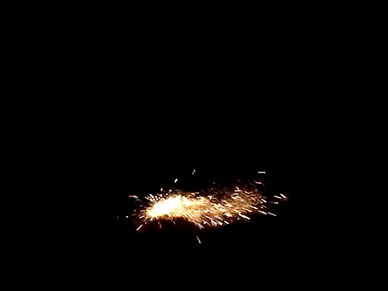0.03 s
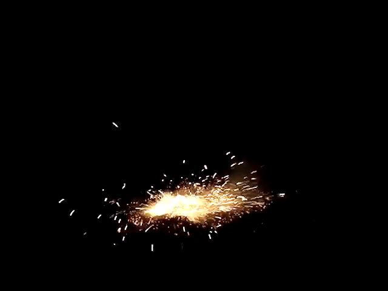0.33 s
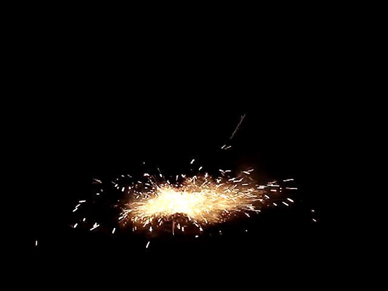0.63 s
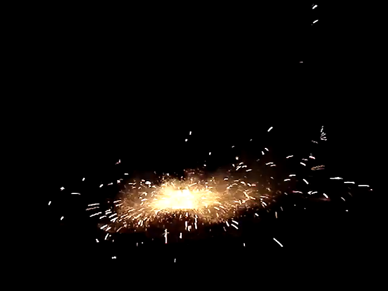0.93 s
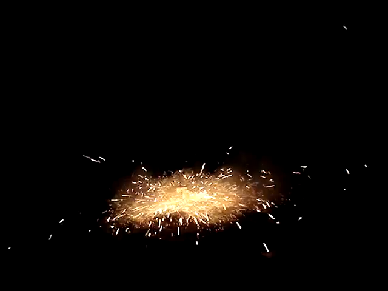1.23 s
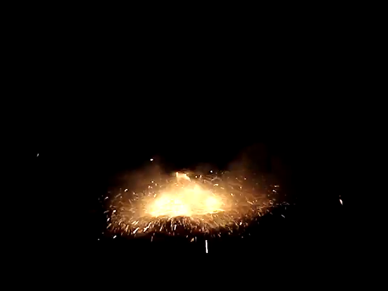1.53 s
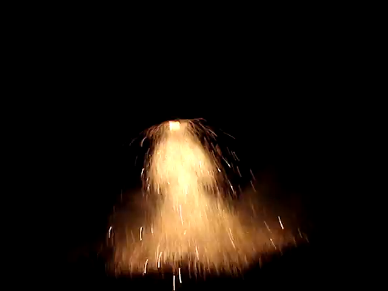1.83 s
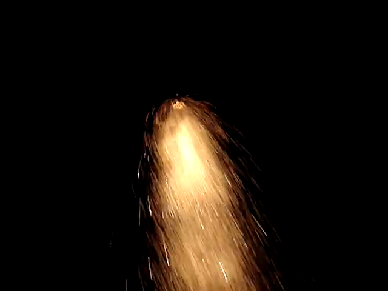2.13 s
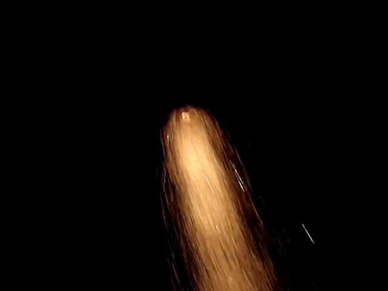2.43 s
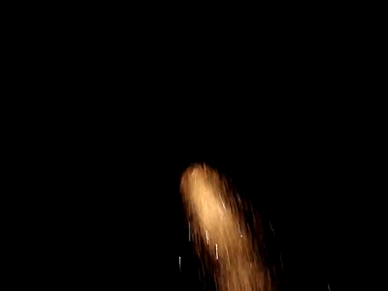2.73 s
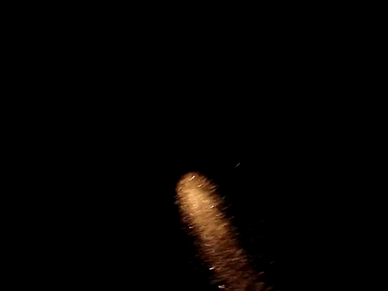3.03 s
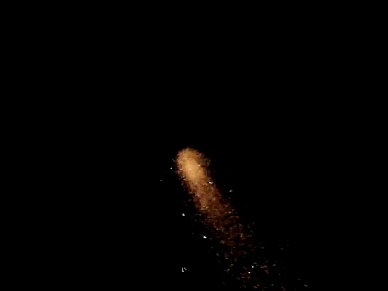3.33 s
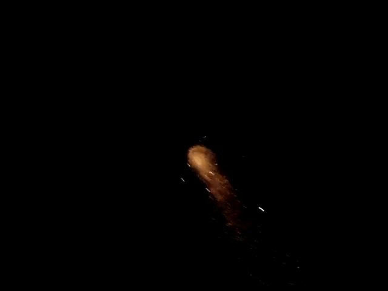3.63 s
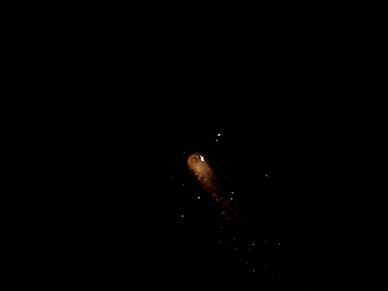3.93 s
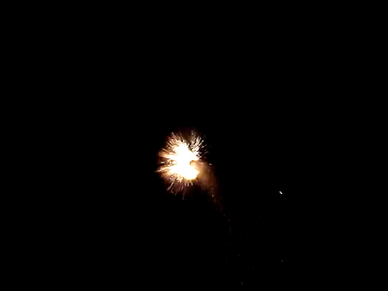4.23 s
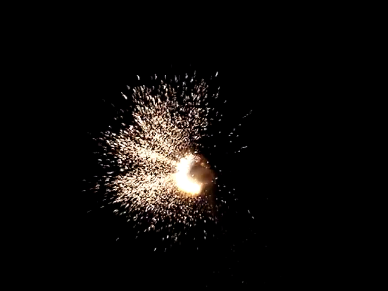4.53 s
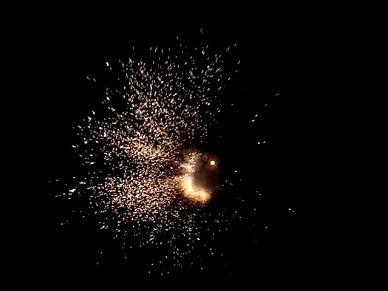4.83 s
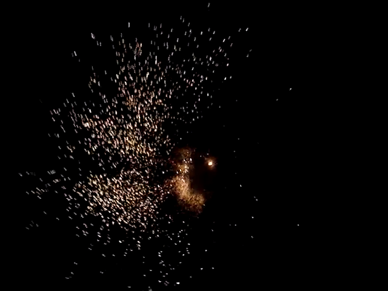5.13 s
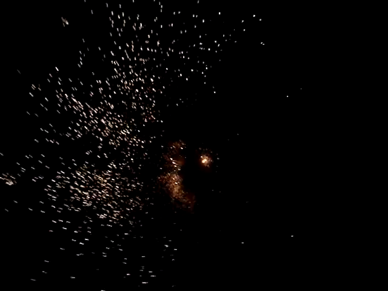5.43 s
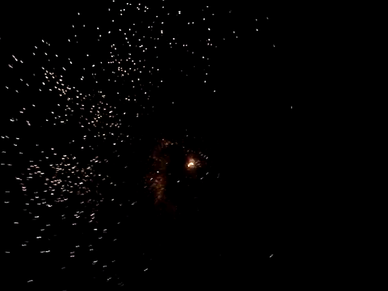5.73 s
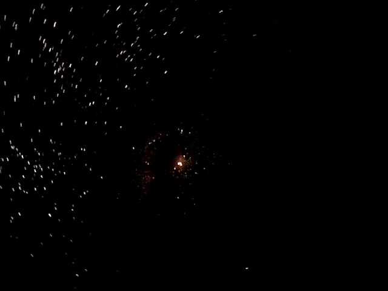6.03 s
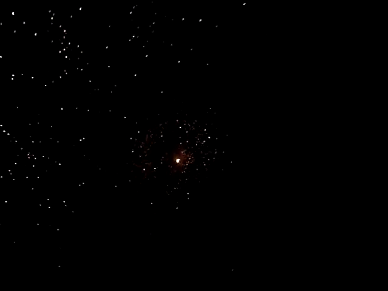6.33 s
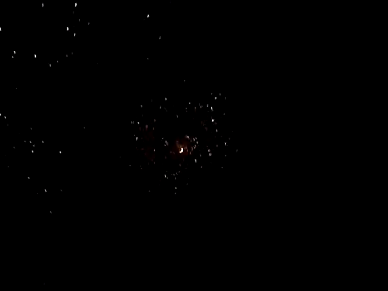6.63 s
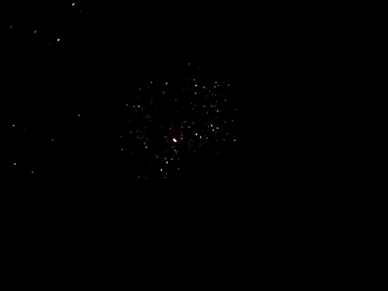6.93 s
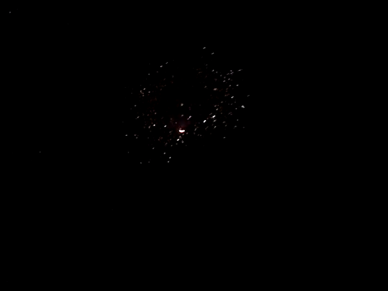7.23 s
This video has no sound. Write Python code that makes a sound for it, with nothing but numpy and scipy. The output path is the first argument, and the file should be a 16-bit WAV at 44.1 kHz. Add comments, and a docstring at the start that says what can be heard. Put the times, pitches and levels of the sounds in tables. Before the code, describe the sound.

A spinning firework hisses in quickening surges, lifts off with a fast flutter, then bursts with a crack and sizzles faintly.

```python
"""A spinner firework tumbles on the ground at night, swinging its hissing jet around as it speeds up. At about
1.6 s it lifts off with a fast flutter, and its bounce off the ground lags more as it climbs. Thin bands of
noise ring late in the flight. Near 4 s the spark charge flares into a roaring spray with a few low puffs. The
sparks sizzle on faintly, with soft ringing and a few snaps, while the background level rises."""
import sys
import numpy as np
from scipy import signal
from scipy.fft import rfft, irfft, next_fast_len
from scipy.io import wavfile
from scipy.ndimage import uniform_filter1d, map_coordinates

SR = 44100
rng = np.random.default_rng(int(sys.argv[2]) if len(sys.argv) > 2 else 0)


def master_out(mix):
    """Clip the mix to full scale and print it as 16-bit PCM to the path in sys.argv[1]."""
    frames = np.transpose(np.atleast_2d(mix))
    ceiling = np.clip(frames, -1, 1)
    pcm = np.round(ceiling * 32767).astype(np.int16)
    wavfile.write(sys.argv[1], SR, pcm)


N = 320607
TIME = np.arange(N) / SR

# The jet's tone on the ground and in the air. Each row: frequency in Hz, relative level in dB.
GROUND_TONE = [(71, -45.5), (120, -25.5), (177, -8), (261, -14.5), (413, -5.5), (804, -7.5), (949, -2.5),
               (1350, -2.5), (1880, -4), (2720, -1.5), (3460, -4), (4820, 1.5), (5900, -1), (7790, 2),
               (9900, -4), (12900, -49), (21800, -120)]
AIR_TONE = [(100, -31), (160, -17.5), (300, -14), (500, -5.5), (900, -2), (1500, 0.5), (2500, 2.5),
            (3300, 0), (4200, 2), (5700, 0.5), (7300, 3), (8500, 0.5), (10000, -6)]


def jet():
    """Gas rushes from the spinning nozzle, first on the ground near a wall, then aloft."""
    roar, hiss = beam()
    grounded, flying = handover(1.56, 1.716)
    on_ground = burning(GROUND_TONE, grains_per_s=2500, grain_db=-13.5)
    on_ground = unit(on_ground + amp(-18) * delayed(on_ground, lag_ms=2.9))  # slap off the wall
    aloft = burning(AIR_TONE, grains_per_s=3000, grain_db=-10.5)
    aloft = bounced(aloft, near_db=-2.5, far_db=-7)
    gas = patchy(grounded * on_ground + flying * aloft, depth_db=1.6)
    lows = roar * band(gas, 88, 3060)
    mids = amp(-5.0) * np.sqrt(roar * hiss) * band(gas, 3300, 4670)  # beams between roar and hiss
    unsteady = handover(2.2, 2.9)[0]  # the fast spin steadies the jet
    flicker = amp(1.8 * wobble(90) * unsteady)
    highs = amp(-1.1) * hiss * flicker * band(gas, 5330, 12700)
    rumble = low_rumble(hiss * flicker)
    waver = amp((.3 + .6 * unsteady) * wobble(70))
    return waver * (lows + mids + highs) + rumble


# The jet's bed level while it points away. Each row: time in seconds, roar in dB, hiss in dB.
FACING_AWAY = [(0.0, -34, -31), (0.4, -33, -29.5), (0.74, -52, -46.5), (1.1, -43.5, -43.5),
               (1.55, -36, -35), (2.15, -35.5, -31.5), (2.4, -32.5, -28.5), (2.75, -31.5, -25.5),
               (3.4, -35, -25.5), (3.8, -34, -28)]
# Swings towards the listener. Each row: start in seconds, hold in seconds, roar in dB, hiss in dB.
SWINGS = [(0.0, 0.083, -32, -28.5), (0.241, 0.059, -28.5, -32), (0.339, 0.099, -29, -30),
          (0.503, 0.068, -29, -27), (0.639, 0.052, -29, -27), (0.817, 0.044, -26.5, -28),
          (0.979, 0.073, -29, -28.5), (1.181, 0.068, -27.5, -28.5), (1.353, 0.072, -28.5, -26.5),
          (1.569, 0.035, -24, -29), (1.688, 0.066, -32.5, -25), (1.819, 0.037, -33, -26),
          (1.9, 0.059, -34, -26), (2.005, 0.05, -36.5, -25.5), (2.136, 0.039, -31.5, -27.5),
          (2.25, 0.037, -37, -26)]


def tumble():
    """Gains of roar and hiss as the jet swings past: it creeps up, cuts in, sags and drops away."""
    roar_power, hiss_power = amp(curves(FACING_AWAY)) ** 2
    for start, hold, roar_db, hiss_db in SWINGS:
        lead_in = amp(-6.5) ** 2 * envelope(start, 0, rise_db_per_s=151, fall_db_per_s=1098)
        swing = np.maximum(lead_in, envelope(start, hold, rise_db_per_s=550, fall_db_per_s=1098))
        sag = np.interp(TIME, [start, start + hold], [1, amp(-3) ** 2])
        roar_power += amp(roar_db) ** 2 * swing * sag
        hiss_power += amp(hiss_db) ** 2 * swing
    return np.sqrt(roar_power), np.sqrt(hiss_power)


# The spin winding up. Each row: time in seconds, turns per second.
SPIN_RATE = [(0, 9), (0.35, 14), (0.65, 16.9), (0.85, 18.5), (1.0, 22.5), (1.2, 24.4), (1.4, 22.5),
             (1.58, 24.5), (1.75, 33.5), (1.95, 44.5), (2.15, 49.4), (2.4, 53.3), (2.6, 57.5), (3.0, 61),
             (3.4, 67.1), (4.2, 77)]
# How sharply the jet beams. Each row: time in seconds, once-a-turn and twice-a-turn depth from 0 to 1.
FLUTTER_DEPTH = [(0.4, 0.08, 0), (0.9, 0.4, 0.08), (1.6, 0.35, 0.08), (1.85, 0.13, 0.06), (2.1, 0.16, 0.2),
                 (2.4, 0.2, 0.38), (3.4, 0.13, 0.16)]


def beam():
    """Gains with spin flutter: the roar beams along the jet, once a turn; the hiss sideways too, twice."""
    roar, hiss = tumble()
    angle = 2 * np.pi * np.cumsum(curves(SPIN_RATE)[0]) / SR
    once, twice = curves(FLUTTER_DEPTH)
    roar_flutter = 1 + once * (np.cos(angle) + 0.47 * np.cos(2 * angle))  # the overtone sharpens it
    hiss_flutter = 1 + 0.81 * once * np.cos(angle) - twice * np.cos(2 * angle)
    return roar * np.abs(roar_flutter), hiss * np.abs(hiss_flutter)


# The rumble's tone. Each row: frequency in Hz, relative level in dB.
RUMBLE_TONE = [(15, 7), (40, -5), (80, -3.5), (130, -13.5), (200, -24), (350, -42), (1000, -71)]


def low_rumble(hiss):
    """A low rumble that rises and falls with the hiss and thins out over time."""
    gate = np.sqrt(envelope(start=0.45, hold=3.01, rise_db_per_s=34, fall_db_per_s=200))
    follow = (hiss / amp(-25)) ** 1.4 * amp(2.2 * wobble(22.02))  # 1.4 dB for each dB of hiss
    return amp(-42.5 - 4.2 * TIME) * gate * follow * noise(RUMBLE_TONE)


# The flame's tone. Each row: frequency in Hz, relative level in dB.
FLAME_TONE = [(59, -48), (100, -28), (233, -13.5), (356, -3), (407, -6), (554, -1.5), (671, -6), (711, -1),
              (1530, 1.5), (1750, 0.5), (2300, 2), (3370, 0), (6010, 2), (7710, -1), (9900, -9),
              (12900, -49), (21800, -120)]
# The charge smoulders, then blazes. Each row: start of the hold in seconds, hold in seconds,
# rise and fall in dB per second, then body, roar and hiss in dB.
FLARE_BURNS = [(3.84, 0.37, 10, 44, -43, -32.5, -30), (4.17, 0.19, 55, 84, -48, -30.5, -24.5),
               (4.31, 0.029, 98, 202, -38, -33.5, -48)]


def flare():
    """The spark charge catches and roars."""
    gas = burning(FLAME_TONE, grains_per_s=1900, grain_db=-8.5)
    gas = bounced(gas, near_db=-13, far_db=-7.5)
    return spray(FLARE_BURNS, patchy(gas, depth_db=2.06))


# Gas puffs in the flare. Each row: centre in seconds, half width in seconds, level in dB.
PUFFS = [(4.19, 0.016, -30), (4.334, 0.004, -21.5), (4.346, 0.006, -22.5), (4.362, 0.0034, -26.5)]
# Their dull tone. Each row: frequency in Hz, relative level in dB.
PUFF_TONE = [(30, -16), (130, -15), (290, -1.5), (600, 4), (900, 7.5), (1400, 3), (2300, 4.5),
             (4000, -17.5), (10000, -25)]


def puffs():
    """The charge empties in a few low puffs of gas."""
    power = sum(amp(db) ** 2 * swell(centre, width) for centre, width, db in PUFFS)
    return np.sqrt(power) * noise(PUFF_TONE)


# The sizzle's tone. Each row: frequency in Hz, relative level in dB.
SIZZLE_TONE = [(100, -17.5), (180, -9), (300, -3.5), (470, 1.5), (700, -8), (1200, -5), (2500, -7.5),
               (4000, -10.5), (4800, -11), (6500, -14), (8000, -16), (10000, -28.5)]
# Showers of sparks. Each row: start of the hold in seconds, hold in seconds,
# rise and fall in dB per second, then body, roar and hiss in dB.
SHOWERS = [(4.5, 0.048, 180, 12.9, -81, -43.5, -42.5), (5.85, 1.4, 6.1, 30.4, -50, -51.5, -59.5),
           (5.98, 0.57, 9.8, 69, -56, -49, -48.5), (6.42, 0.24, 47, 130, -48, -47, -60)]


def sparks():
    """The cloud of sparks sizzles in showers that swell and burn out."""
    gas = burning(SIZZLE_TONE, grains_per_s=900, grain_db=-5.5)
    return spray(SHOWERS, patchy(gas, depth_db=1.23))


# Single sparks snapping. Each row: start in seconds, peak level in dB.
SNAPS = [(4.178, -10), (6.1733, -27.5), (6.5968, -27), (6.8065, -25.5)]
# A snap's ring. Each row: frequency in Hz, relative level in dB, seconds to fall by 60 dB.
SNAP_MODES = [(900, 0, 0.015), (1480, -7, 0.01), (2030, 0, 0.011), (2560, -1, 0.012), (3400, -4.5, 0.009)]


def snaps():
    """A larger grain bursts with a dry crack of a few milliseconds."""
    out, t = np.zeros(N), np.arange(SR // 20) / SR
    attack = 1 - np.exp(-t / 0.0002)
    for start, peak_db in SNAPS:
        ring = sum(amp(db - 60 * t / t60) * np.sin(2 * np.pi * (hz * t + rng.random()))
                   for hz, db, t60 in SNAP_MODES)
        burst = .15 * amp(-60 * t / .008) * rng.standard_normal(len(t))
        crack = (ring + burst) * attack
        out[round(start * SR):][:len(t)] += amp(peak_db) * crack / np.abs(crack).max()
    return out


# Ringing near 4 kHz during the flight, then higher and fainter among the embers.
# Each row: start and end in seconds, low and high band edge in Hz, level in dB.
RINGING_BANDS = [(2.7, 3.55, 3840, 3990, -37.5), (2.7, 3.6, 4200, 4330, -40.5),
                 (5.5, 6.35, 4580, 4740, -59), (6.15, 6.68, 5020, 5220, -59.5),
                 (6.95, 7.4, 6520, 6680, -68)]


def ringing():
    """Thin, wavering bands of ringing noise that fade in and out."""
    out = np.zeros(N)
    for start, end, low_hz, high_hz, db in RINGING_BANDS:
        gate = handover(start, start + 0.065)[1] * handover(end - .1, end)[0]
        out += gate * amp(db + 1.5 * wobble(9.2)) * band(rng.standard_normal(N), low_hz, high_hz)
    return out


# The near and the far bounce.
# Each row: lag on the ground in ms, lag at full height in ms, time constant of the climb in seconds.
BOUNCE_LAGS = [(0.98, 2.38, 0.23), (1.05, 11.3, 1.04)]
# Soft ground dulls the bounces. Each row: frequency in Hz, gain in dB.
GROUND_EQ = [(900, 0), (1500, -2), (3000, -8), (10000, -14)]
LIFT_OFF_S, NEAR_FADE_DB_PER_S = 1.62, 6


def bounced(x, near_db, far_db):
    """Two bounces lag more with height and sweep a comb through x; the near one fades on the way up."""
    airborne_s = np.maximum(TIME - LIFT_OFF_S, 0)
    near, far = [delayed(x, ground_ms + (top_ms - ground_ms) * np.tanh(airborne_s / climb_s))
                 for ground_ms, top_ms, climb_s in BOUNCE_LAGS]
    echoes = amp(near_db - NEAR_FADE_DB_PER_S * airborne_s) * near + amp(far_db) * far
    return unit(x + filtered(echoes, lambda hz: colour(GROUND_EQ, hz)))


# The night ambience. Each row: frequency in Hz, relative level in dB.
NIGHT_TONE = [(20, -9), (75, -4), (120, -11), (180, 1), (260, -2), (450, -6.5), (850, 4.5), (1200, 3),
              (2300, -26), (3300, -18), (10000, -22.5)]


def night():
    """Distant outdoor hum that wavers; the background level rises by 8 dB between 4.6 s and 5.9 s."""
    rise_db = np.interp(TIME, [4.6, 5.9], [-8, 0])
    return amp(-50.0 + rise_db + 0.65 * wobble(9.1)) * noise(NIGHT_TONE)


def burning(tone, grains_per_s, grain_db):
    """Turbulent gas plus the tiny cracks of burning grains, at rms 1."""
    cracks = (rng.random(N) < grains_per_s / SR) * rng.uniform(-0.66, 1, N)
    source = rng.standard_normal(N) + amp(grain_db) * unit(cracks)
    return unit(filtered(source, lambda hz: colour(tone, hz)))


def spray(burns, gas):
    """Burning gas: each burn swells, holds and dies, with its own share of body, roar and hiss."""
    power = sum(np.outer(amp(band_dbs) ** 2, envelope(start, hold, rise, fall))
                for start, hold, rise, fall, *band_dbs in burns)
    body, roar, hiss = np.sqrt(power)
    return body * band(gas, 74, 693) + roar * band(gas, 710, 2375) + hiss * band(gas, 2580, 14000)


def patchy(x, depth_db):
    """The colour of x shifts in narrow, short-lived patches, at rms 1."""
    spectra = signal.stft(x, nperseg=1024)[2]
    patches = uniform_filter1d(rng.standard_normal(spectra.shape), size=4, axis=0)  # across frequency
    patches = uniform_filter1d(patches, size=8, axis=1)  # across time
    return unit(signal.istft(spectra * amp(depth_db * unit(patches)), nperseg=1024)[1][:N])


def envelope(start, hold, rise_db_per_s, fall_db_per_s):
    """Power that reaches 1 at start, stays for hold seconds and falls."""
    db = np.minimum(rise_db_per_s * (TIME - start), fall_db_per_s * (start + hold - TIME))
    return amp(2 * np.clip(db, -150, 0))


def swell(centre, width):
    """A blunt bell curve of power; centre and half width in seconds."""
    out, width = np.zeros(N), abs(width) + 1e-4
    near = slice(*np.searchsorted(TIME, [centre - 6 * width, centre + 6 * width]))
    out[near] = np.exp(-.5 * (np.abs(TIME[near] - centre) / width) ** 2.3)
    return out


def handover(start, end):
    """Equal-power fade-out and fade-in between two times in seconds."""
    share = np.clip((TIME - start) / max(end - start, 1e-3), 0, 1)
    return np.sqrt(1 - share), np.sqrt(share)


def curves(rows):
    """One value per sample for each column after the time."""
    times, *columns = np.transpose(rows)
    return [np.interp(TIME, times, column) for column in columns]


def wobble(rate):
    """A smooth random curve, rate knots a second."""
    knots = rng.standard_normal(int(N * rate / SR) + 4)
    coarse = np.linspace(0, N / SR, N // 20)
    return np.interp(TIME, coarse, map_coordinates(knots, [coarse * rate]))


def noise(tone):
    """Coloured noise of rms 1."""
    return unit(filtered(rng.standard_normal(N), lambda hz: colour(tone, hz)))


def band(x, low_hz, high_hz):
    """One steep-sided band of x, at rms 1."""
    def response(hz):
        return ((1 + (low_hz / (hz + 1)) ** 16) * (1 + (hz / high_hz) ** 16)) ** -.5
    return unit(filtered(x, response))


def colour(points, hz):
    """Gain of an EQ curve through (Hz, dB) points on a log axis."""
    point_hz, db = np.transpose(points)
    return amp(np.interp(np.log(hz + 1), np.log(point_hz + 1), db))


def filtered(x, response):
    """x through a gain that depends on frequency."""
    size = next_fast_len(N + SR // 4)
    return irfft(rfft(x, size) * response(np.fft.rfftfreq(size, 1 / SR)), size)[:N]


def delayed(x, lag_ms):
    """x heard later by a lag that may change."""
    return np.interp(TIME - lag_ms / 1000, TIME, x)


def amp(db):
    """Decibels to gain."""
    return np.exp(np.asarray(db) * (np.log(10) / 20))


def unit(x):
    """Scaled to rms 1."""
    return x / np.sqrt(np.mean(x ** 2) + 1e-20)


def scene():
    """The jet gives way to the flare, which leaves the sparks behind in the night."""
    jet_out, flare_in = handover(3.59, 3.87)
    firework = jet_out * jet() + flare_in * (flare() + puffs()) + sparks()
    return (firework + ringing() + snaps() + night())[None]


def record(dry):
    """A brick-wall high cut takes the very top off the mono mix."""
    return filtered(dry[0], lambda hz: hz < 10080)[None]


dry = scene()
out = record(dry)
master_out(out)
```